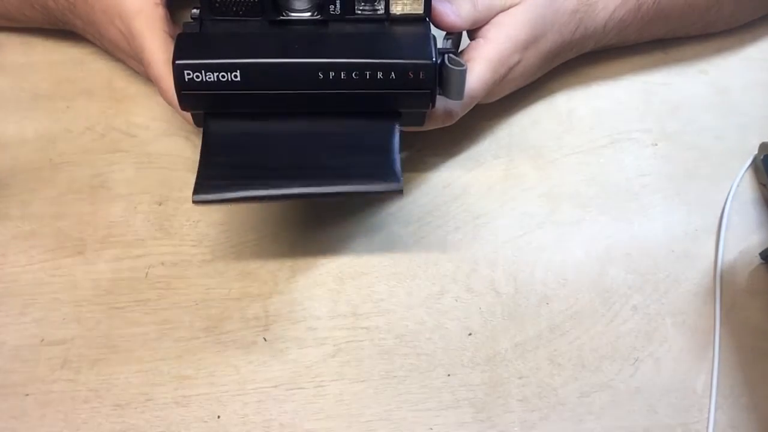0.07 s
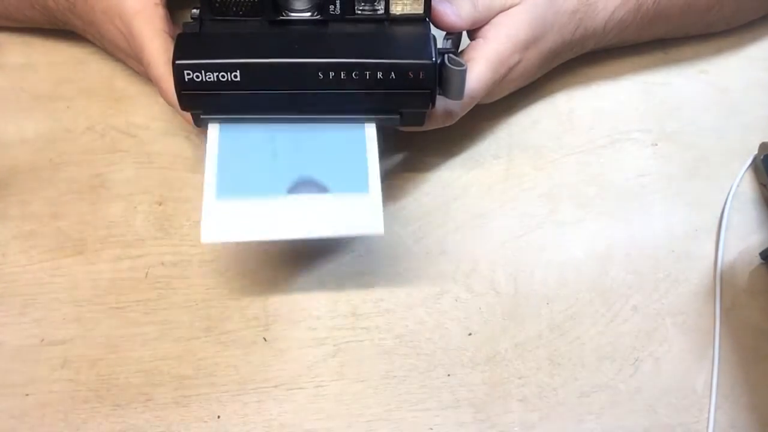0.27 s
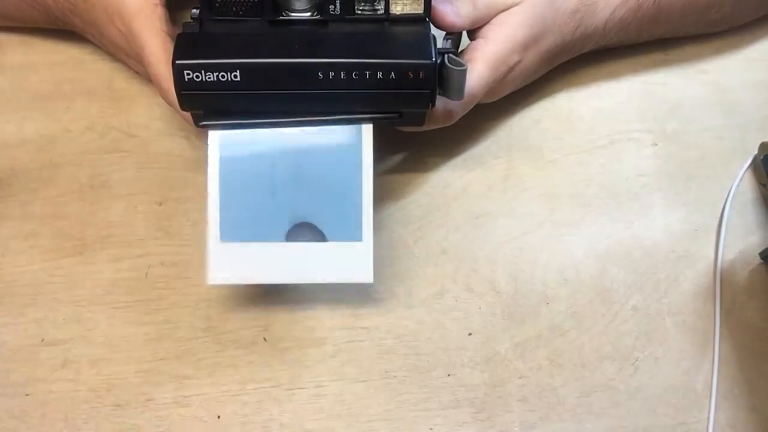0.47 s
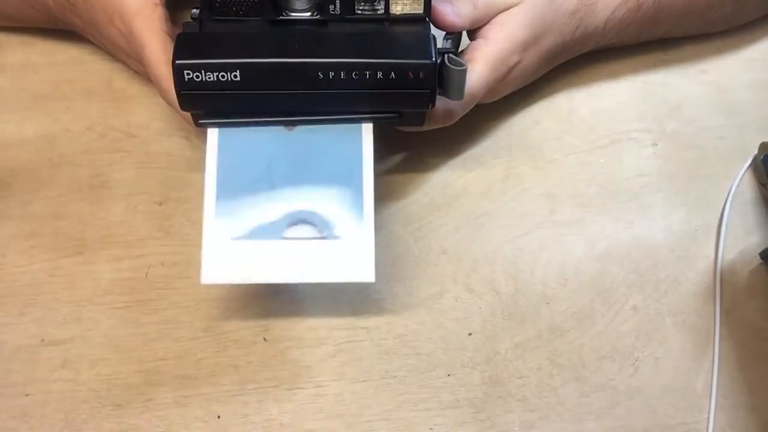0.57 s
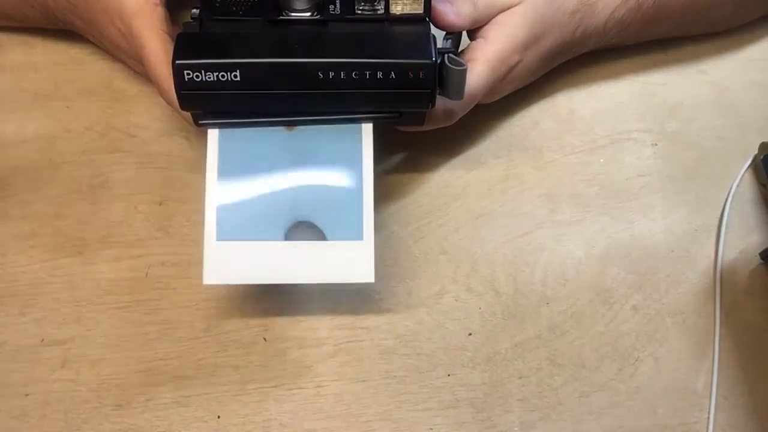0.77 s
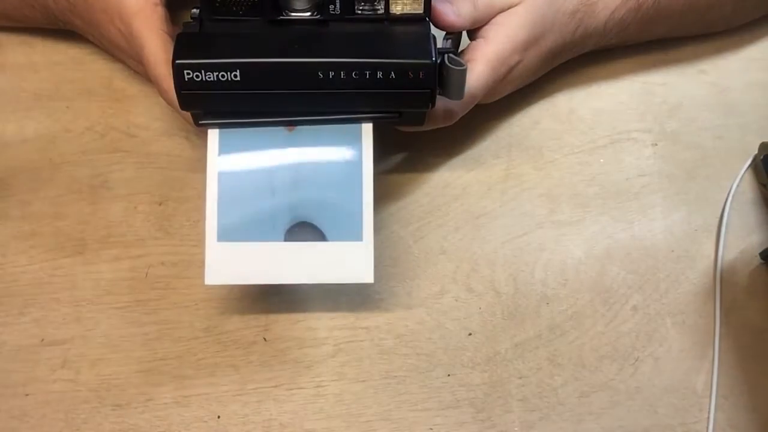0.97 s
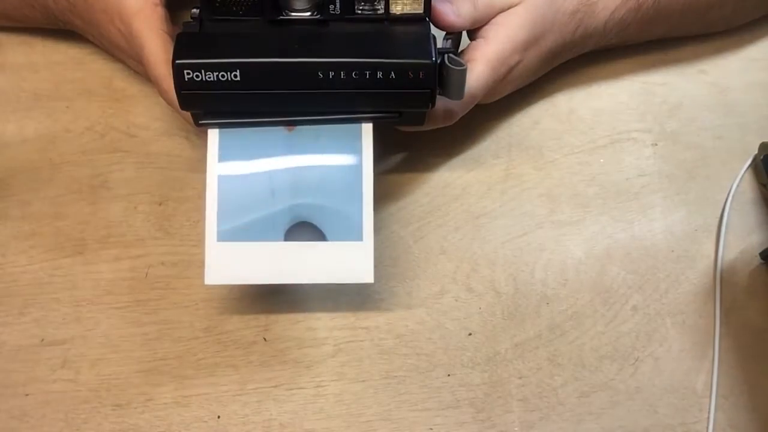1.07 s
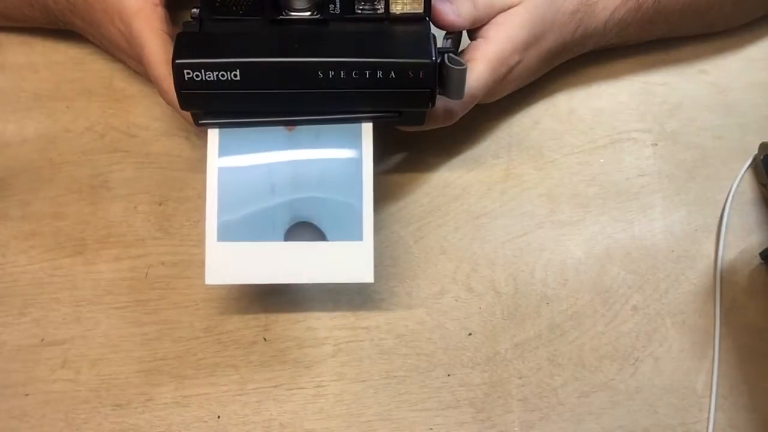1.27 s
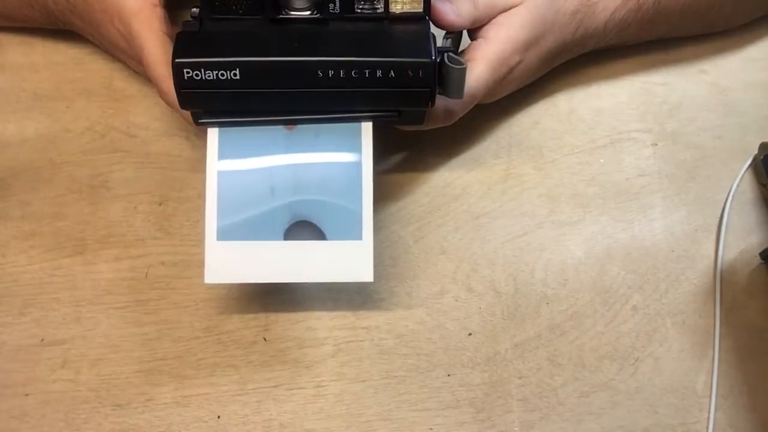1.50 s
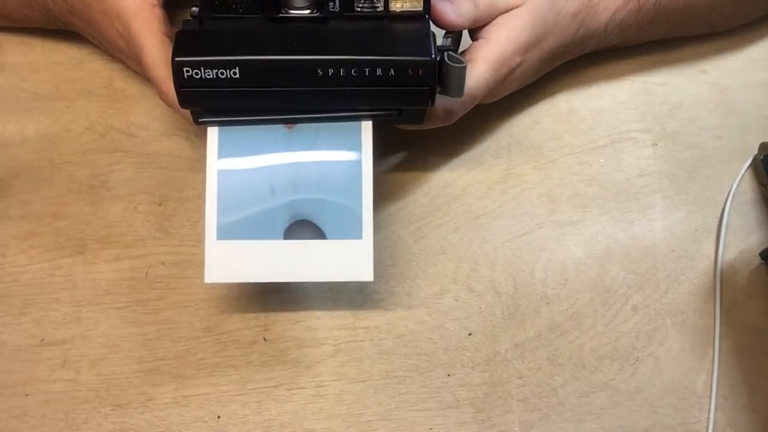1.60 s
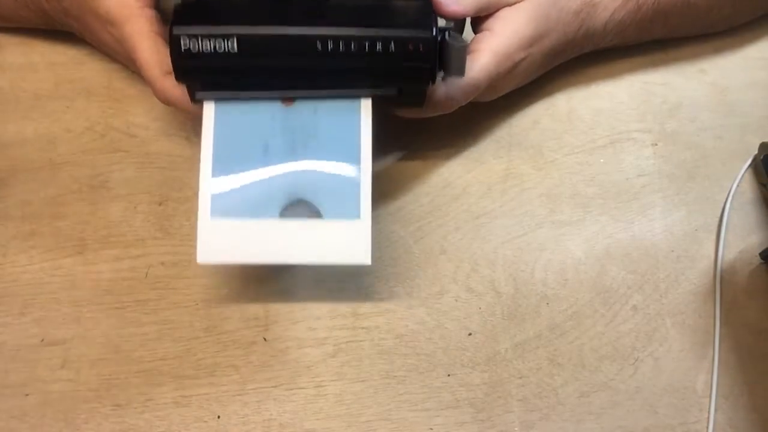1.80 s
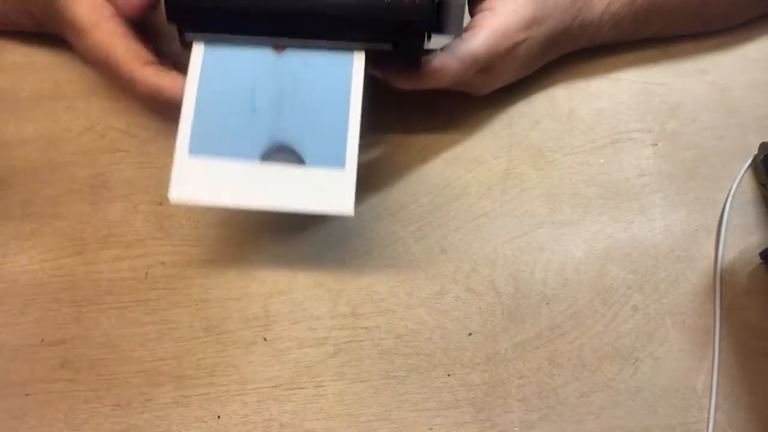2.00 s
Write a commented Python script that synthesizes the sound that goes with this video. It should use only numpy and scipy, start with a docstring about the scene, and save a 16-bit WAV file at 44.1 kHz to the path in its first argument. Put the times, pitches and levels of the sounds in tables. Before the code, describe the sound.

Instant camera motor whines and rattles, latches clack and snap, gears run down, faint ringing follows

```python
"""An instant camera ejects a print, heard close in a quiet small room: gear tones whine, teeth rattle, a pawl ticks.
Latches clack as bursts of noise with short modes, and the light shield snaps back in a run of noisy slaps.
The unloaded gears race, then run down, and a spring's few sine modes ring on alone.
Last, fingers tap and slide on the case as shaped noise, with one faint squeak of skin on plastic."""
import sys
import numpy as np
from scipy import signal
from scipy.fft import rfft, irfft, next_fast_len
from scipy.io import wavfile
from scipy.ndimage import map_coordinates

SR = 44100
rng = np.random.default_rng(int(sys.argv[2]) if len(sys.argv) > 2 else 0)


def bounce(signal):
    """Save signal as a 16-bit WAV file at the path given by the first command-line argument."""
    frames = np.transpose(np.atleast_2d(signal))
    limited = np.clip(frames, -1, 1)
    pcm = np.round(limited * 32767).astype(np.int16)
    wavfile.write(sys.argv[1], SR, pcm)


N = 90404

# The motor's speed through the ejection. Each row: time in seconds, shaft tone in Hz.
MOTOR_SPEED = [(0, 346), (.065, 360), (.18, 362), (.23, 372), (.3, 400), (.35, 420), (.47, 420), (.52, 450),
               (.595, 482), (.645, 390), (.78, 355)]


def amp(db):
    """Decibels to gain."""
    return 10 ** (np.asarray(db) / 20)


def unit(x):
    """Scale to rms 1."""
    return x / np.sqrt(np.mean(x ** 2) + 1e-20)


def curve(rows):
    """Join (seconds, value) points by straight lines, one value per sample."""
    return np.interp(np.arange(N) / SR, *np.transpose(rows))


def colour(points, hz):
    """Gain at each frequency from (Hz, dB) points on a log axis."""
    f, db = np.transpose(points)
    return amp(np.interp(np.log(hz + 1), np.log(f + 1), db))


def wobble(rate):
    """A smooth random curve with rate knots a second."""
    knots = rng.standard_normal(N // 8)
    return map_coordinates(knots, [np.arange(N) * rate / SR + 2], mode="wrap")


def filtered(x, response):
    """Multiply the spectrum of x by a response of frequency in Hz."""
    m = next_fast_len(N + SR // 2)
    return irfft(rfft(x, m) * response(np.fft.rfftfreq(m, 1 / SR)), m)[:N]


def noise(points):
    """Coloured noise of rms 1."""
    return unit(filtered(rng.standard_normal(N), lambda hz: colour(points, hz)))


def decay(s, t60, rise):
    """An envelope that starts at s and falls 60 dB in each t60, all in seconds."""
    t = np.maximum(np.arange(N) / SR - s, 0)
    return amp(-60 * t / t60) * (1 - np.exp(-t / rise))


def ring(modes, s, damping, rise=0.00011):
    """Modes (Hz, width in Hz, relative dB) struck at s; the wider a mode, the sooner it dies."""
    t = np.arange(SR // 8) / SR
    out = np.zeros(N + SR)
    start = round(s * SR)
    size = np.linalg.norm([amp(db) for _, _, db in modes])
    for hz, width, db in modes:
        fade = np.exp(-np.pi * width * damping * t)
        tone = np.sin(2 * np.pi * (hz * t + rng.random()))
        out[start:][:len(t)] += amp(db) / size * fade * tone
    return out[:N] * decay(s, 10, rise)


def gear_tones():
    """Each gear pair sings unsteadily at its own multiple of the shaft speed."""
    # The whine of the gear train.
    # Each row: multiple of the shaft tone, level in dB under load, level in dB running free.
    gear_pairs = [(1, -56, -54), (1.46, -48, -57), (1.92, -66, -51), (2.02, -58, -60), (2.87, -48, -53),
                  (3.25, -53, -55), (3.53, -54, -55), (10.46, -48, -60), (13.9, -55, -62), (17.3, -53, -63)]
    flutter, rough_db, waver_db = .008, 2.5, 2.8  # flutter is a share of the speed
    release_s, release_length_s = .29, .1  # the load eases around this moment
    stop_s, stop_fade_s = .794, .14  # the gears come to rest
    t, speed = np.arange(N) / SR, curve(MOTOR_SPEED)
    free = np.clip((t - release_s) / release_length_s + .5, 0, 1)
    out = np.zeros(N)
    for multiple, loaded_db, free_db in gear_pairs:
        turns = np.cumsum(multiple * speed * (1 + flutter * wobble(160))) / SR
        steady_db = loaded_db + free * (free_db - loaded_db)
        level_db = steady_db + rough_db * wobble(130) + waver_db * np.tanh(wobble(35))
        out += amp(level_db) * np.sin(2 * np.pi * turns)
    return out * np.clip((stop_s - t) / stop_fade_s, 0, 1)


def gear_rattle(level, points, tooth_db, rough_db, knocks=0):
    """Teeth scrape inside the plastic case; a share of the scraping repeats with each turn of a slower wheel."""
    wheel_ratio = .204  # wheel turns per shaft cycle
    repeating_share = .25  # of the scraping's power
    speed = curve(MOTOR_SPEED)
    turns = np.cumsum(speed) / SR
    flaws = rng.standard_normal(round(SR / (wheel_ratio * speed.max())))
    place = wheel_ratio * turns * len(flaws) % len(flaws)
    repeating = unit(map_coordinates(flaws, [place], mode="grid-wrap"))
    fresh = rng.standard_normal(N)
    grit = np.sqrt(repeating_share) * repeating + np.sqrt(1 - repeating_share) * fresh
    # the scraping swells once per shaft cycle and roughens at random
    scrape = unit(grit * amp(tooth_db * np.cos(2 * np.pi * turns) + rough_db * wobble(350)))
    in_case = filtered(scrape + knocks, lambda hz: colour(points, hz) * case(hz))
    return amp(curve(level)) * unit(in_case)


def loaded_rattle():
    """Under the load of the rollers the teeth scrape with a marked swell per shaft cycle."""
    # Rattle while driving the rollers. Each row: time in seconds, level in dB.
    loaded_level = [(0, -40.5), (.2, -40.5), (.3, -39), (.37, -38), (.43, -44), (.52, -50.5), (.6, -84)]
    # Its spectrum. Each row: frequency in Hz, relative density in dB.
    loaded_colour = [(150, -23.5), (290, -24.5), (380, 0.5), (500, -5.5), (700, -12.5), (900, -7.5),
                     (1150, 0), (1400, -6), (1560, 0), (2060, -11), (2800, -7.5), (3200, -11), (3750, -6.5),
                     (4300, -11), (5100, -9.5), (6200, -8.5), (8300, -10.5), (9300, -6.5), (10400, -13),
                     (13400, -14), (16000, -30)]
    return gear_rattle(loaded_level, loaded_colour, tooth_db=3.0, rough_db=0.7)


def free_rattle():
    """With the load gone the gears race and run down, loose teeth knocking among the scraping."""
    # Rattle while running free. Each row: time in seconds, level in dB.
    free_level = [(.4, -63), (.46, -37.5), (.51, -41.5), (.56, -34), (.61, -34.5), (.68, -40), (.72, -43.5),
                  (.768, -46.5), (.79, -62), (.83, -90)]
    # Its spectrum. Each row: frequency in Hz, relative density in dB.
    free_colour = [(150, -29), (290, -19), (400, -9), (540, -13.5), (700, -6.5), (900, -2.5), (1150, -4),
                   (1870, -0.5), (2220, -12), (2870, -3.5), (3770, -6), (4100, -13.5), (4760, -14.5),
                   (5150, -11), (6770, -8), (8400, -12), (10800, -13), (16000, -22)]
    return gear_rattle(free_level, free_colour, tooth_db=-0.5, rough_db=0.5, knocks=loose_teeth())


def loose_teeth(t60=.005):
    """Loose teeth give tiny knocks of decaying noise at random moments."""
    knocks_per_s, knock_db = 190, -4  # level against the scraping
    hits = (rng.random(N) < knocks_per_s / SR) * rng.uniform(-1, 1, N)
    t = np.arange(SR // 50) / SR
    envelope = signal.fftconvolve(hits, amp(-60 * t / t60))[:N]
    return amp(knock_db) * unit(envelope * rng.standard_normal(N))


def case(hz):
    """The hollow case lifts the sound around each of its resonances."""
    # Resonances of the case. Each row: centre in Hz, width in Hz, lift in dB.
    resonances = [(897, 42, 6.5), (1007, 14, 2.5), (1083.6, 26, 7.5), (1278, 45, 2.5), (1526, 19, 4),
                  (1720, 61, 0.5), (1940, 33, 3), (2809, 70, 4.5), (3130, 90, 3), (3700, 27, 5),
                  (6450, 140, 2)]
    return amp(sum(db / (1 + (2 * (hz - centre) / width) ** 2) for centre, width, db in resonances))


def pawl(t60=.025):
    """A light, bright tick for each tooth that the pawl rides over."""
    # Ticks of the pawl. Each row: start in seconds, level in dB.
    ticks = [(.012, -33.5), (.04, -31), (.0673, -31), (.0943, -34), (.1217, -34), (.1485, -33.5),
             (.1755, -30.5), (.2022, -32), (.2538, -29), (.279, -36), (.3043, -28.5), (.3985, -36),
             (.424, -36.5)]
    # Their spectrum. Each row: frequency in Hz, relative level in dB.
    tick_colour = [(500, -23), (3000, -7), (6500, -0.5), (8300, -8), (9300, 4.5), (10300, -6), (13000, 0),
                   (16000, -17)]
    return noise(tick_colour) * sum(amp(db) * decay(s, t60, rise=.0002) for s, db in ticks)


def latches(ring_db=-3, damping=1.25):
    """Plastic levers drop against their stops: a crack and a short ring, each tilted in its own way."""
    # Latch clacks. Each row: start in seconds, level in dB, crack's T60 in seconds, tilt in dB per octave.
    clacks = [(.2285, -30, .02, 4), (.2299, -23, .03, 5), (.2576, -16.5, .028, 0.5),
              (.2628, -21, .025, 1.5), (.4575, -32.5, .035, 4), (.4715, -36, .04, -2)]
    # Spectrum of the crack before the tilt. Each row: frequency in Hz, relative level in dB.
    latch_colour = [(150, -26), (420, -10), (850, -12), (1200, 3.5), (1900, -1), (2150, -9.5), (2650, -3.5),
                    (3150, -5), (3800, -5), (4700, -5.5), (5150, -8), (5700, -5.5), (12700, -16.5),
                    (16000, -26)]
    # Modes of the levers. Each row: frequency in Hz, width in Hz before damping, relative dB before the tilt.
    latch_modes = [(1900, 50, 0), (2340, 36, -2), (2640, 44, -1), (3500, 150, -5), (3750, 52, -3),
                   (3900, 46, -1), (4210, 39, -7), (4740, 55, -4)]
    out = np.zeros(N)
    for s, db, t60, tilt_db in clacks:
        crack = noise([(hz, level + tilt_db * np.log2(hz + 1)) for hz, level in latch_colour])
        modes = [(hz, width, level + tilt_db * np.log2(hz)) for hz, width, level in latch_modes]
        ringing = amp(ring_db) * ring(modes, s, damping)
        out += amp(db) * (crack * decay(s, t60, rise=.0001) + ringing)
    return out


def shield():
    """The light shield springs back in a quick run of slaps; as it hits home the case rings."""
    # Slaps of the shield. Each row: start in seconds, level in dB, T60 in seconds.
    snaps = [(.3135, -34, .06), (.3163, -27, .06), (.3246, -23, .03), (.3262, -21, .02), (.3274, -11, .016),
             (.3298, -14.5, .022), (.336, -33, .08)]
    # Their spectrum. Each row: frequency in Hz, relative level in dB.
    shield_colour = [(20, -56), (70, -27), (150, -27), (280, -21.5), (400, -7), (520, -12.5), (750, -6.5),
                     (1200, -5), (1660, -3), (1950, -12.5), (2300, -0.5), (2900, -10.5), (3500, -1),
                     (4500, -5), (5800, -5), (7000, -6.5), (10000, -10.5), (13000, -10), (16000, -21.5)]
    # Ringing of the case when struck. Each row: frequency in Hz, width in Hz before damping, relative dB.
    struck_modes = [(1110, 50, -10), (1660, 86, 0), (2120, 82, -7), (2750, 30, -10), (3450, 110, -3),
                    (4020, 52, -1), (4440, 180, -3), (5070, 85, -9), (5280, 76, -4), (5750, 110, -11),
                    (6710, 61, -6), (7310, 52, -8), (8040, 140, -7), (8870, 57, -9)]
    home_s, home_db, home_rise_s = .3277, -5, .002
    slaps = sum(amp(db) * noise(shield_colour) * decay(s, t60, rise=.0002) for s, db, t60 in snaps)
    return slaps + amp(home_db) * ring(struck_modes, home_s, 0.9, home_rise_s)


def spring():
    """A spring, shaken as the slowing motor passes its pitch, rings on alone in decaying sine modes."""
    # Modes of the spring. Each row: frequency in Hz, level in dB, T60 in seconds.
    spring_modes = [(400, -50, 1.38), (1080, -55, 0.35), (1230, -53, 0.48), (2620, -62, 0.3),
                    (3720, -47, 0.44)]
    start_s, rise_s = 0.61, 0.0049
    t = np.arange(N) / SR
    out = np.zeros(N)
    for hz, db, t60 in spring_modes:
        out += amp(db) * decay(start_s, t60, rise_s) * np.sin(2 * np.pi * hz * t)
    return out


def hands(t60=.055):
    """Fingers tap the case, each a dull body with a click, and slide on it with a wavering hiss."""
    # Finger taps. Each row: start in seconds, body level in dB, click level in dB.
    finger_taps = [(.939, -71, -74), (1.039, -90, -85), (1.104, -79, -88.5), (1.434, -58.5, -83.5),
                   (1.479, -78, -78.5), (1.595, -69, -86), (1.687, -67, -84), (1.764, -60, -66.5),
                   (1.8, -63.5, -83), (1.856, -57, -75), (1.918, -56, -78)]
    # Spectra of the body and of the click. Each row: frequency in Hz, relative level in dB.
    body_colour = [(80, -2), (400, 10.5), (680, -4), (1000, 12), (1350, -8), (1750, 2.5), (2600, -27),
                   (8000, -46)]
    click_colour = [(500, -20), (3000, 12), (6000, 4), (15000, -6)]
    # Hands sliding. Each row: time in seconds, level in dB.
    rub_level = [(1.55, -90), (1.7, -79.5), (1.85, -72.5), (1.93, -68.5), (2.05, -72.5)]
    # Spectrum of the sliding. Each row: frequency in Hz, relative level in dB.
    rub_colour = [(100, -15), (200, -12.5), (300, -12.5), (420, -5.5), (720, -12.5), (1050, -2), (1840, -7),
                  (2400, -7), (3100, -12), (4200, -18), (9750, -20.5), (16000, -33)]
    body, click = noise(body_colour), noise(click_colour)
    taps = np.zeros(N)
    for s, body_db, click_db in finger_taps:
        taps += decay(s, t60, rise=.0008) * (amp(body_db) * body + amp(click_db) * click)
    return taps + amp(curve(rub_level) + 1.2 * wobble(50)) * noise(rub_colour)


def squeak():
    """Skin dragging on plastic squeaks faintly: a narrow band of noise that swells and fades."""
    centre_s, spread_s, level_db = 1.74, .04, -77
    pitch_hz, width_hz = 2730, 140
    swell = np.exp(-.5 * ((np.arange(N) / SR - centre_s) / spread_s) ** 2)
    band = filtered(rng.standard_normal(N), lambda hz: 1 / (1 + ((hz - pitch_hz) / width_hz) ** 2))
    return amp(level_db) * swell * unit(band)


def room(x):
    """A short tail from the walls; its warm middle range lasts longest."""
    bright_colour = [(200, -2), (2000, -5), (5000, -2), (16000, -1.5)]  # (Hz, dB)
    warm_colour = [(200, -8), (600, 2.5), (1200, -5), (3000, -16), (16000, -40)]  # (Hz, dB)
    bright = noise(bright_colour) * decay(0.001, t60=.3, rise=.003)
    warm = noise(warm_colour) * decay(0.0047, t60=.34, rise=.0087)
    tail = bright + amp(-10.5) * warm
    return signal.fftconvolve(x, tail / np.linalg.norm(tail))[:N]


def background():
    """The quiet room's steady floor is noise, strongest in the bass."""
    # Spectrum of the floor. Each row: frequency in Hz, relative level in dB.
    floor_colour = [(20, -18.5), (35, -4), (55, 5), (110, -1.5), (190, -14), (270, -14.5), (400, -19),
                    (600, -18), (1190, -27), (1570, -32.5), (7100, -36), (9700, -36.5), (16000, -44.5)]
    return amp(-68) * noise(floor_colour)


def scene():
    """The camera and the hands close by, with the room's weak tail and floor behind them."""
    gears = gear_tones() + loaded_rattle() + free_rattle()
    camera = gears + pawl() + latches() + shield() + spring()
    near = camera + hands() + squeak()
    room_db = -21
    return (near + amp(room_db) * room(near) + background())[None]


def record(dry):
    """The microphone channel keeps nothing at or above its band limit."""
    top_hz = 15800
    return filtered(dry[0], lambda hz: hz < top_hz)[None]


dry = scene()
out = record(dry)
bounce(out)
```